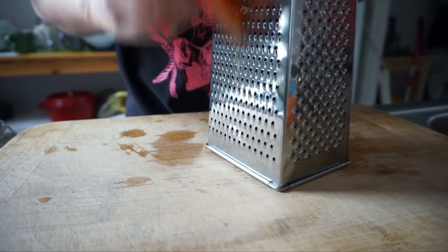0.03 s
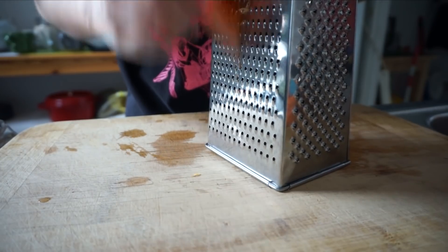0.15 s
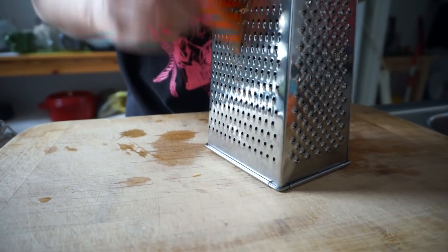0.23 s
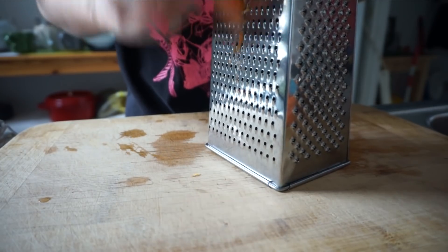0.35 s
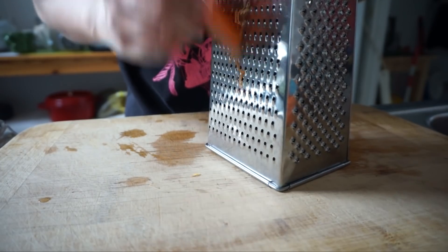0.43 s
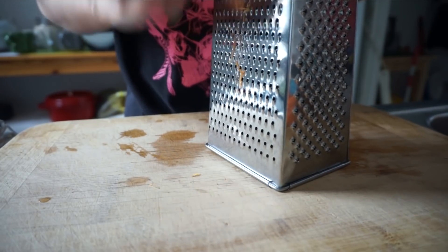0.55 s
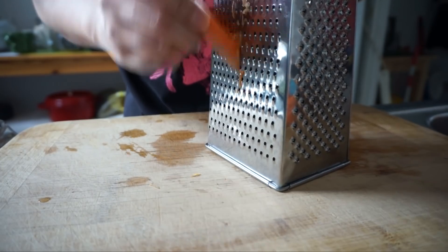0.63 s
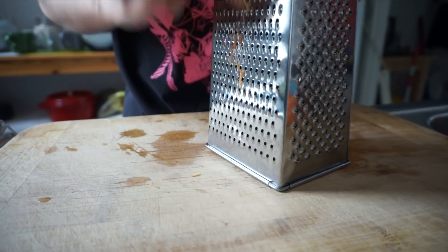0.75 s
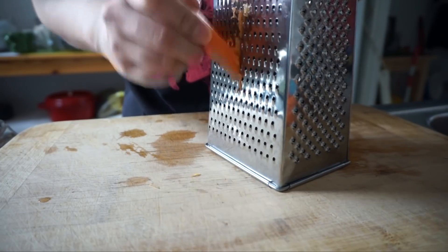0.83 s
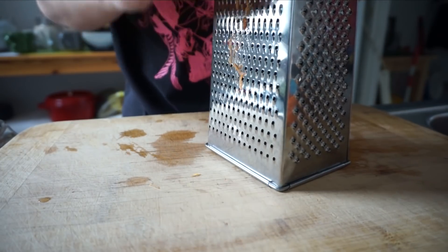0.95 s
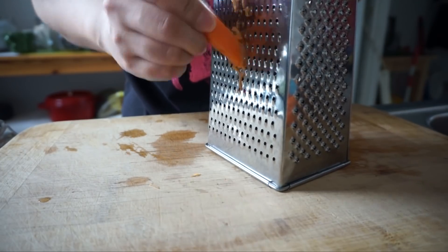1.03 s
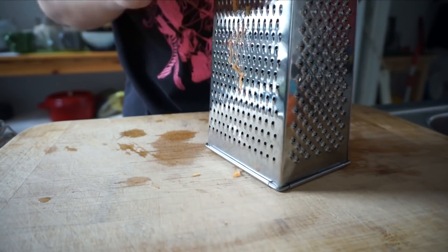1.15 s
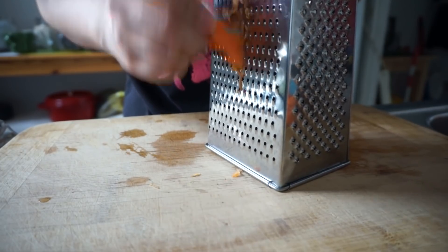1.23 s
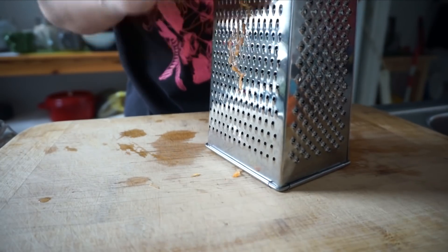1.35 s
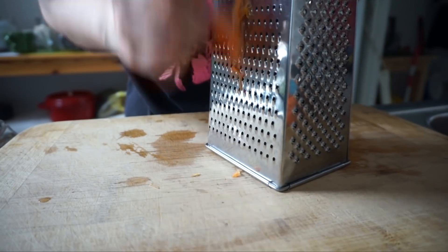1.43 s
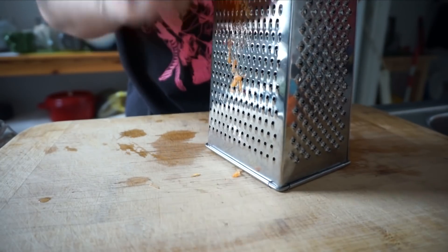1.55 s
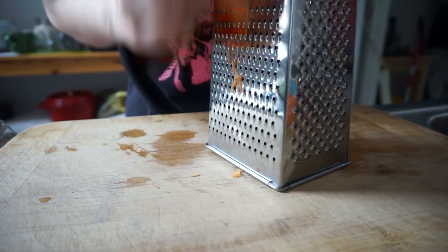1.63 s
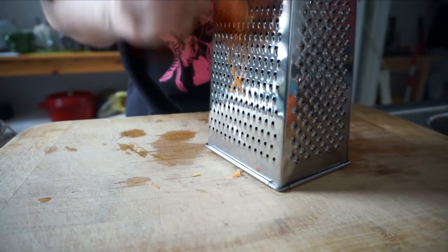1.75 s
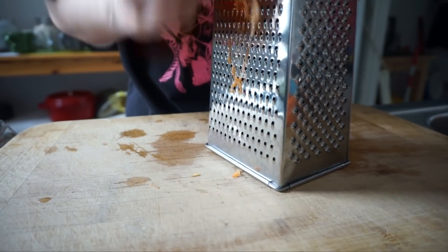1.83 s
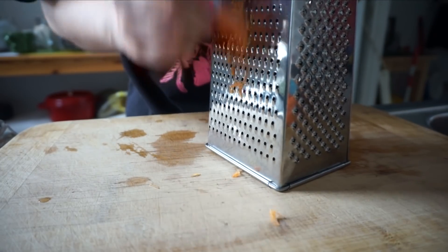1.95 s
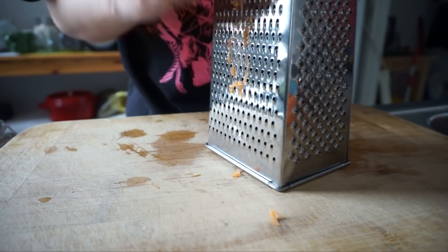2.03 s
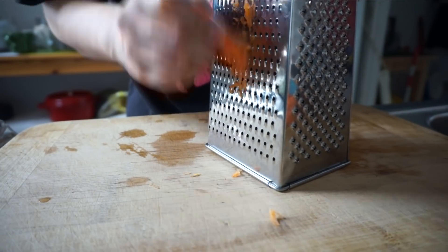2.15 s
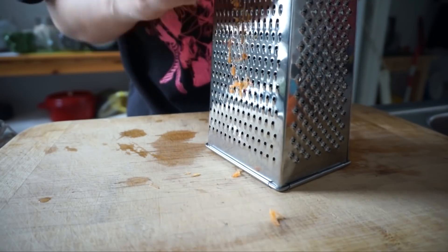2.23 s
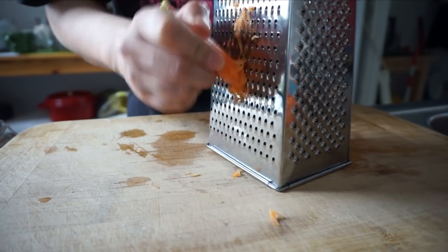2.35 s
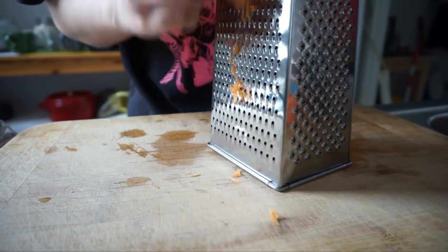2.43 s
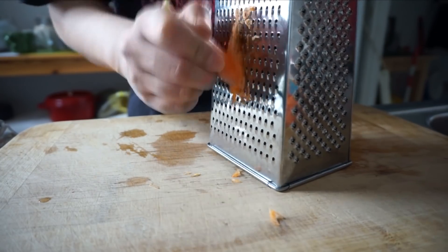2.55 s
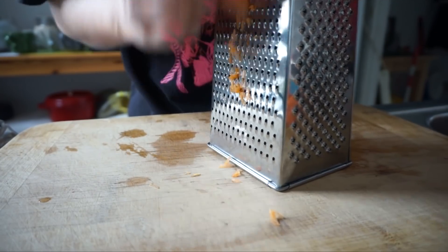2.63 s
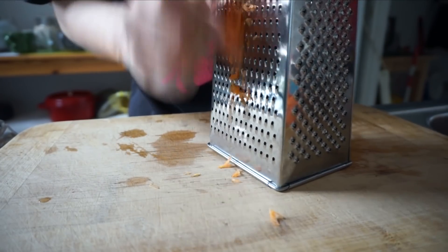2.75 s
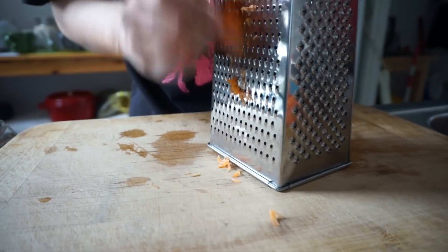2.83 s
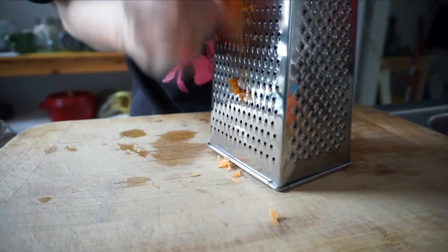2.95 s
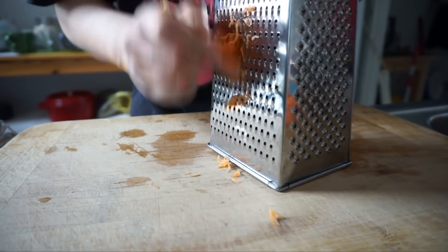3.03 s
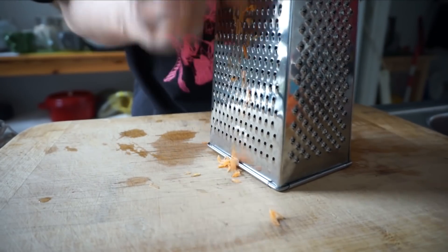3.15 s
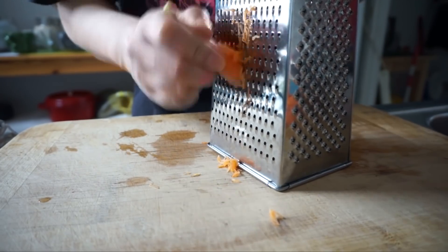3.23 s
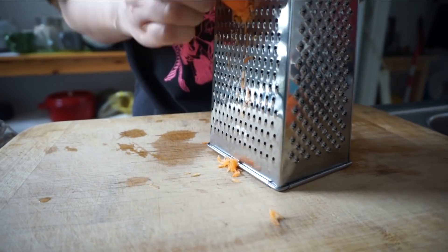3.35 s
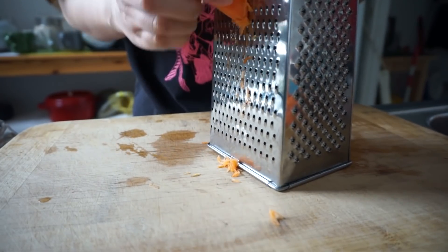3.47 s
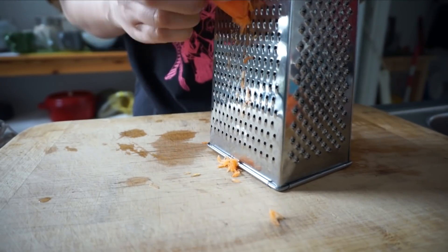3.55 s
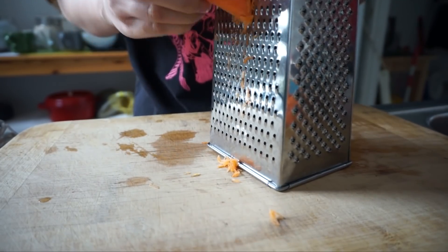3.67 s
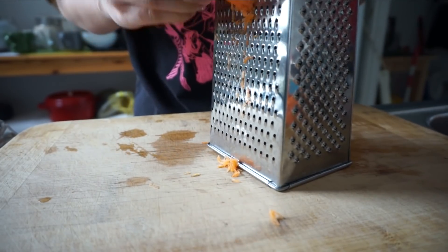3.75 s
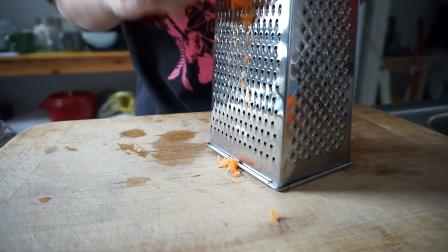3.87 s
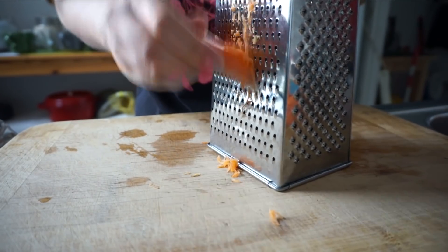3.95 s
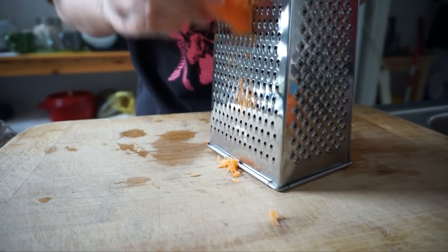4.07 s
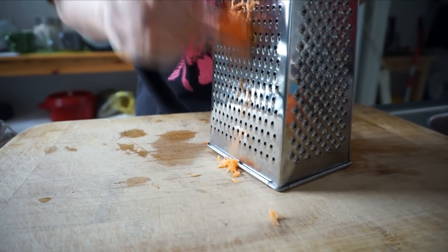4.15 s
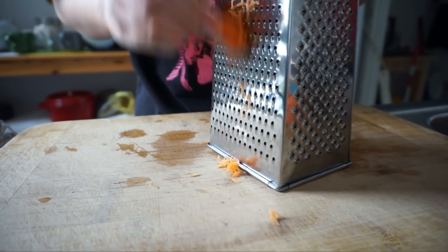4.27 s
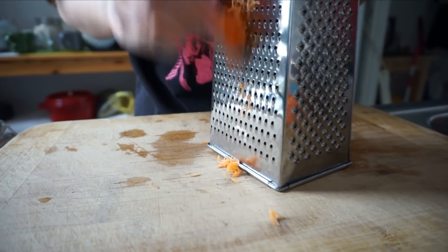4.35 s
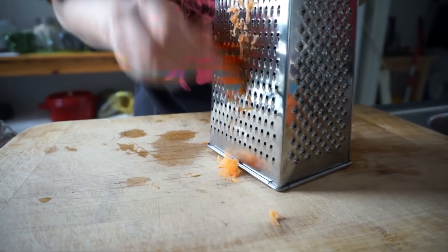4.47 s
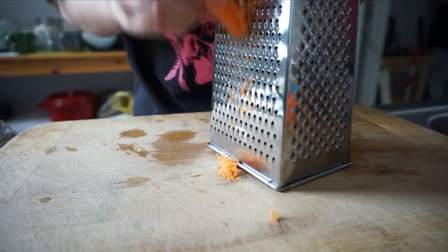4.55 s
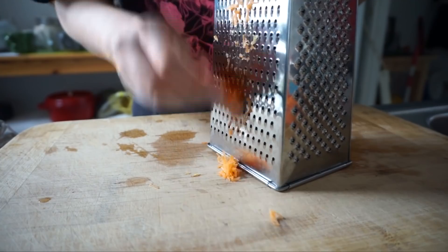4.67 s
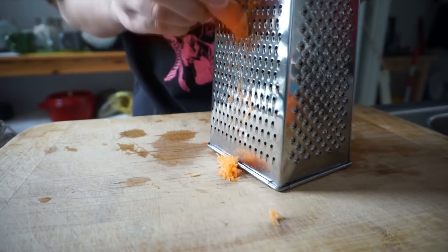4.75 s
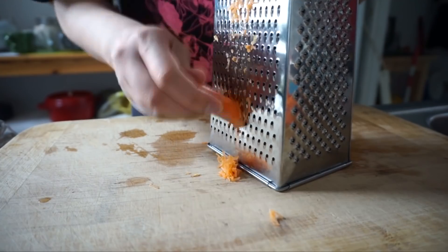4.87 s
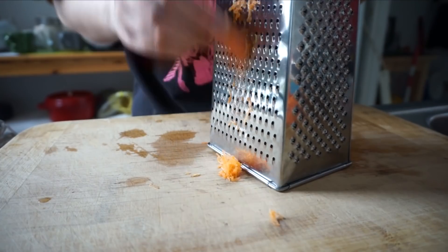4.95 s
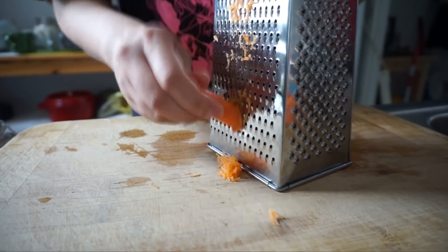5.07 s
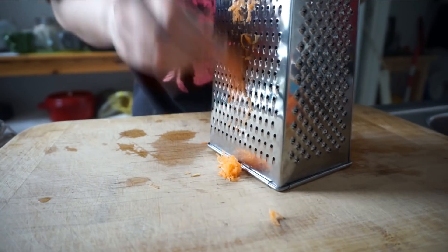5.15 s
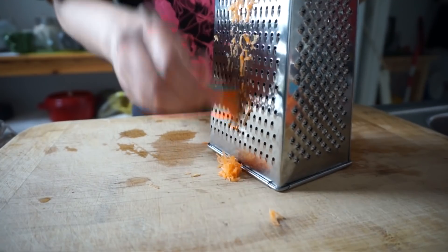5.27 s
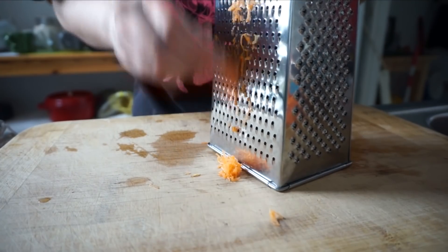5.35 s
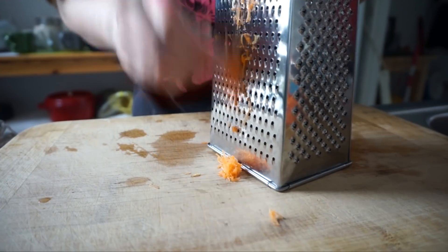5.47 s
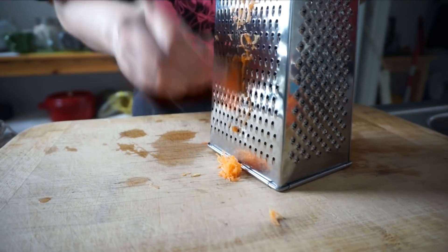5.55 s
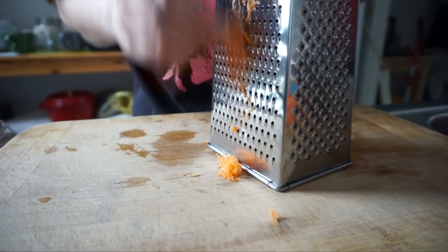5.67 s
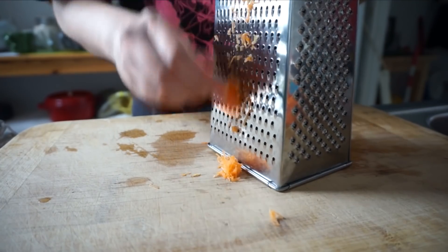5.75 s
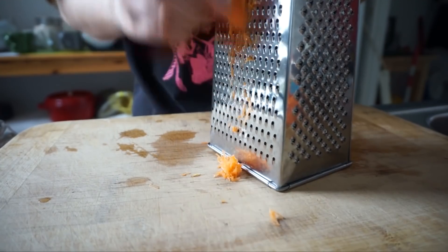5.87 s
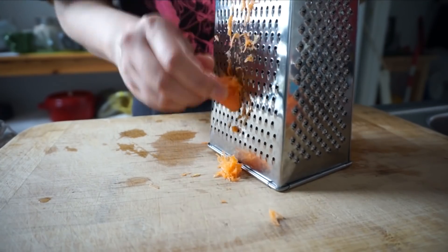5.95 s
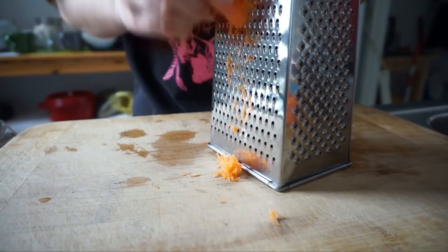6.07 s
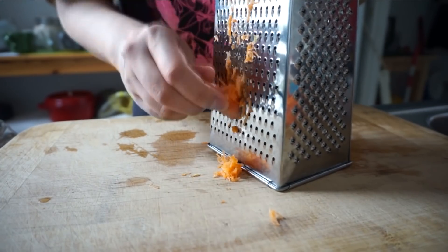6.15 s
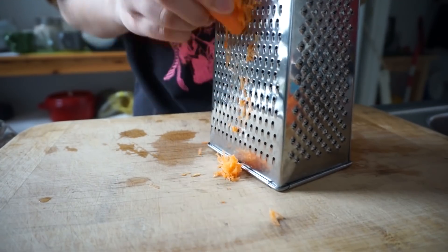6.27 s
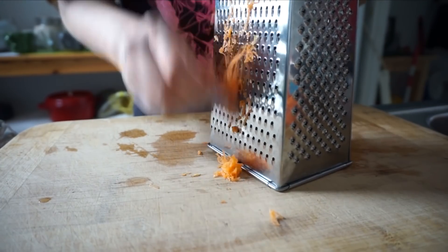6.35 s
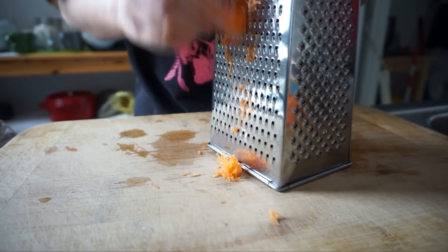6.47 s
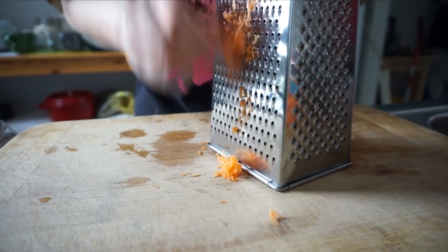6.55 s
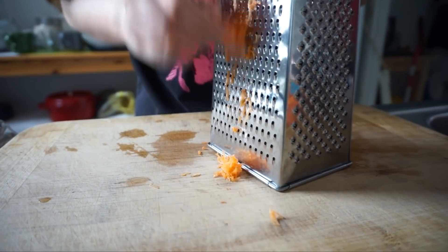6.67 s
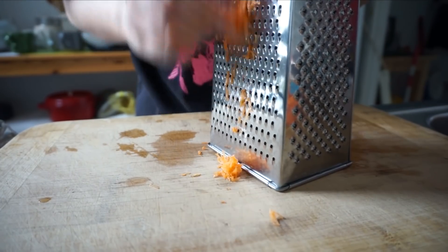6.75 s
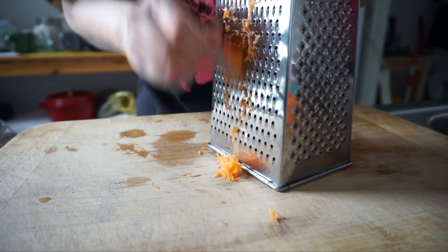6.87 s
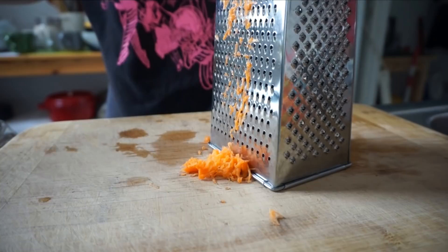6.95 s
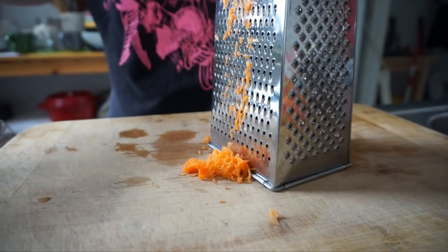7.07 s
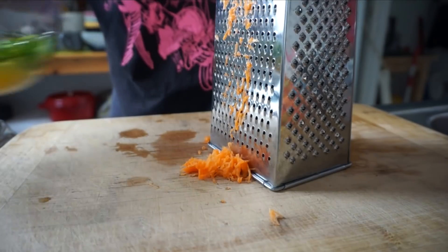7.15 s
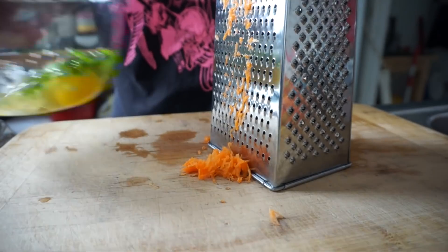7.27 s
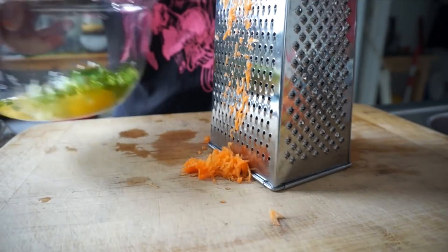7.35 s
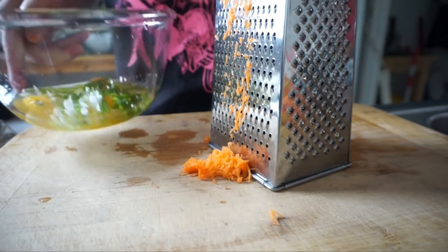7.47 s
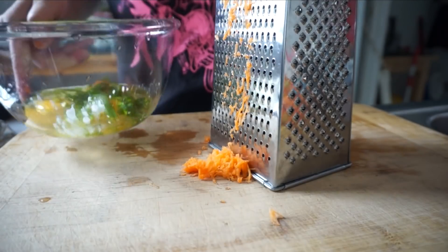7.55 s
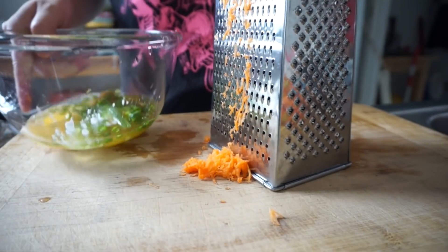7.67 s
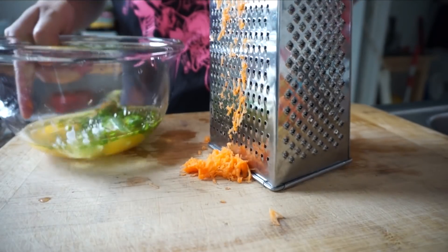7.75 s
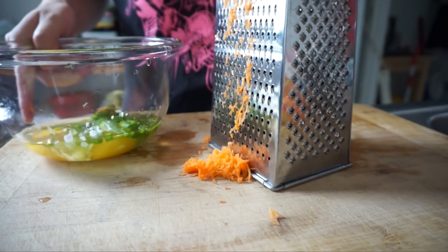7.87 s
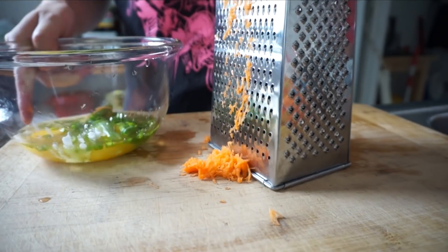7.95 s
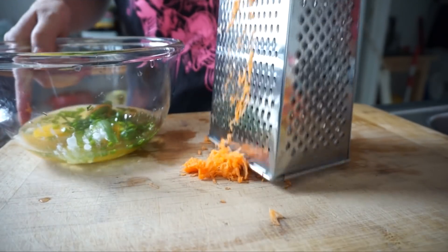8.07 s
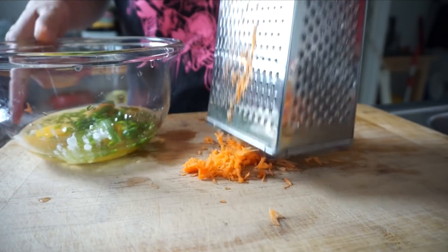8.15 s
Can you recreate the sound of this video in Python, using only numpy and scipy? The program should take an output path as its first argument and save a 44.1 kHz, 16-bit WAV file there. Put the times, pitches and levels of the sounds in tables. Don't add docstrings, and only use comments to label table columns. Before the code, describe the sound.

A small kitchen heard through a camera microphone, almost central. A carrot rasps quickly down and up a thin metal grater, crisp tearing mixed with tinny ringing and a slight boxy boom. The hand lifts, grazes the steel faintly and grates again. The rasping ends suddenly, leaving low room noise, small metallic touches and finally a hard glass clunk with a short, dull rocking clatter on wood.

```python
import sys
import numpy as np
from scipy import signal
from scipy.fft import rfft, irfft, next_fast_len
from scipy.io import wavfile
from scipy.ndimage import uniform_filter1d

SR = 44100
rng = np.random.default_rng(int(sys.argv[2]) if len(sys.argv) > 2 else 0)


def wav_out(sig):
    wavfile.write(sys.argv[1], SR, np.round(np.clip(np.atleast_2d(sig).T, -1, 1) * 32767).astype(np.int16))


def voltage_ratio(decibels):
    exponent = np.asarray(decibels, float) / 20
    return 10 ** exponent


N = 362080
LIFT_S, CUT_S = 3.43, 7.037
SIDES = np.array([[1], [-1]])

# turn_s, bite_db, ease_db (as the pressure eases), box_boom_db
DOWN = [(-.035, -13, -16.5, -1), (0.177, -10, -11, -2), (.382, -16, -13, -1.5), (0.597, -11.5, -13.5, 2.5),
        (0.808, -7.5, -11.5, -1), (1.023, -11.5, -12.5, 0), (1.237, -11.5, -9.5, -1.5),
        (1.449, -9.5, -13, 1), (1.67, -15, -11.5, 0.5), (1.884, -14, -16, -0.5),
        (2.102, -10.5, -12.5, -1.5), (2.321, -14, -15, 2), (2.539, -12.5, -14.5, 3.5),
        (2.763, -12.5, -13.5, 4.5), (2.986, -13, -14.5, -3), (3.206, -16, -13.5, 0),
        (3.928, -16.5, -12.5, -2), (4.189, -11, -15.5, -1.5), (4.402, -11, -14, 2.5),
        (4.617, -10.5, -13, -1), (4.843, -13, -11, 1), (5.065, -14, -13.5, 4), (5.285, -12.5, -14, 0.5),
        (5.5, -13, -12, -0.5), (5.712, -14, -15, 0.5), (5.931, -13, -14, 0), (6.143, -11.5, -12.5, 0),
        (6.361, -15, -14, -1), (6.585, -15, -17, 1), (6.798, -11.5, -13.5, 2)]
# peak_s, level_db, rise_s, fall_s
GRAZES = [
    (3.448, -26.5, 0.016, 0.035),
    (3.479, -24.5, 0.017, 0.028),
    (3.669, -43, 0.049, 0.017),
    (3.776, -43, 0.047, .013),
    (3.89, -30.5, 0.0049, 0.028),
]
# start_s, glass_ring_db, board_thud_db
KNOCKS = [(7.735, -39, -37), (7.84, -3, -13), (7.844, -7, -29), (7.870, -6, -39), (7.877, -1.5, -42),
          (7.889, -14, -42), (7.894, -6, -13), (7.899, -14, -39), (7.906, -21, -33), (7.92, -15, -20),
          (7.934, -11, -35), (7.941, -21, -8.5), (7.95, -8, -32), (7.96, -8, -29), (7.974, -22, -23),
          (7.991, -15, -30), (8.009, -24, -39), (8.022, -25, -43), (8.033, -19, -43), (8.045, -31, -17),
          (8.09, -29, -51), (8.112, -26, -51), (8.125, -33, -47), (8.143, -36, -55), (8.161, -41, -56),
          (8.181, -39, -55)]


def grater():
    teeth_per_s, snap_spread_db = 9000, 2
    rasp_db, steel_db = -1, -2
    boom, wall, face, hiss = contact()
    level_db = pressure()
    haste_db = np.clip(level_db + 16.0, -20, 5)
    bright_db = 0.079 * haste_db
    zones = np.array([boom + 0.11 * haste_db, wall - bright_db, face, 0 * boom, hiss + bright_db])
    sizes = voltage_ratio(snap_spread_db * np.minimum(rng.exponential(1, N), 5)) * rng.choice([-1, 1], N)
    snaps = rms_one(sizes * (rng.random(N) < teeth_per_s / SR))
    direct = teeth_rasp(snaps, level_db, zones)
    walls = steel_walls(snaps, level_db, zones)
    return low_cut(voltage_ratio(rasp_db) * direct + voltage_ratio(steel_db) * walls, 316)


def teeth_rasp(snaps, level_db, zones):
    # pitch_hz, level_db
    rasp_colour = [(24, -52), (40, -55), (243, -70), (296, -0.5), (431, -10), (501, -1), (892, -5),
                   (1150, 0), (1430, -9), (2680, 1), (2970, 0), (5550, -2.5), (15900, -10.5)]
    rasp = colour(snaps * voltage_ratio(level_db), rasp_colour) / np.std(colour(snaps, rasp_colour))
    grid_hz = np.geomspace(30, 20000, 60)
    direct = 0
    for k in range(5):
        share = np.maximum(1 - abs(zone_of(grid_hz) - k), 1e-4)
        direct = direct + voltage_ratio(zones[k]) * colour(rasp, np.c_[grid_hz, 20 * np.log10(share)])
    return direct


def steel_walls(snaps, level_db, zones):
    steel_hz = [300, 511, 700, 757, 975, 1150, 1279, 1696, 1910, 2085, 2197, 2320, 2408, 2620, 2660, 2790,
                3410, 3488, 3922, 4062, 4209, 4511, 4657, 5107, 5537, 5900, 8200]
    # level_db, t60_s
    steel = [(-10.5, 0.06), (-5, 0.054), (-7.5, 0.046), (-3, 0.05), (-5, 0.13), (1, 0.3), (1, 0.071),
             (-3, 0.037), (-1.5, 0.037), (-19, 0.11), (2, 0.044), (-5.5, 0.055), (-2.5, 0.016), (-26, 0.2),
             (3, 0.061), (-2.5, 0.026), (-6.5, 0.14), (1, 0.051), (1, 0.11), (-5, 0.065), (2, 0.026),
             (-0.5, 0.02), (-19, 0.036), (-4.5, 0.051), (1, 0.019), (-14, 0.046), (-30, 0.062)]
    loading = [-1.5, -0.07, 0.98, -0.03, 0.064, -0.7, 0.45, -0.87, 0.79, -0.48, 0.36, 0.87, -0.76, 0.54, 1,
               -0.35, -.1, -0.93, -0.7, -0.86, 0.2, -1.1, -1, -0.019, 0.32, -0.17, .4]
    regripped = [4.3, -0.7, 2.8, -1.9, -10, 2.5, -2, 3, -4.3, -7, -0.5, 4, 1, -2, 0.5, -0.2, 8, -1, 2, -1,
                 -1, 1, 6, 1.5, 0.1, -12, 0.1]
    # pitch_hz, level_db, t60_s
    edges = [(1602, -6, 0.13), (2017, -4.5, 0.085), (2200, -4.5, 0.041), (2705, -7, 0.053),
             (3190, -16, .05), (3800, -8, 0.035), (5110, -9, .04), (5320, -7, 0.032), (6800, -18, .02),
             (7350, -13, .02), (7900, -10, .02), (8900, -7.5, .015), (11050, -10, .015), (11100, -24, .015)]
    wander_db, steady_below_hz, steady_share = 3.8, 1400, 0.3
    damped_cycles = 100
    since = np.arange(N) / SR - 3.5
    modes = []
    for hz, (db, t60), slope, grip_db in zip(steel_hz, steel, loading, regripped):
        modes.append((hz, db + slope * since + grip_db * (since > 0), t60))
    walls = 0
    for number, (hz, mode_db, t60) in enumerate(modes + edges):
        steady = hz < steady_below_hz
        k = min(int(zone_of(hz)), 3)
        contact_db = zones[k] + (zone_of(hz) - k) * (zones[k + 1] - zones[k])
        moving_db = wander_db * (steady_share if steady else 1) * drift(24)
        drive = np.roll(snaps, 997 * number) * voltage_ratio(level_db + mode_db + contact_db + moving_db)
        t60 = t60 if steady else min(t60, damped_cycles / hz)
        walls = walls + ring(drive, hz, t60) / np.sqrt(t60 * SR)
    return walls


def zone_of(hz):
    centre_hz = [500, 1200, 2400, 4500, 11000]
    return np.interp(np.log(hz), np.log(centre_hz), np.arange(5))


def pressure():
    # start_s, extra_db
    snags = [(0.149, 2), (0.339, 3), (0.55, 7.5), (.618, 3), (.715, 2), (.778, 1), (1.189, 6), (1.408, 7),
             (1.644, 11), (1.828, 2), (1.848, 9), (1.902, 5), (2.338, -4), (2.896, 9.5), (3.228, 5),
             (4.128, 11), (4.34, 2), (4.375, 4), (4.533, 0), (5.625, 11), (5.698, -1), (5.731, 1),
             (5.902, 9), (6.603, 3)]
    lift_db, hover_db, last_db = -41, -65, -29
    bite_db, bite_s = 2, 0.008
    flutter_db, rows_db, rows_per_s = 1, 0.5, 51
    rows = [(LIFT_S, lift_db), (LIFT_S + 0.1, hover_db), (GRAZES[-1][0], hover_db), (CUT_S + 0.0092, last_db)]
    jolts = np.zeros(N)
    for (s, first_db, ease_db, _), (bite, ease, turn_db, _, _), (swell_db, *_), _ in strokes():
        middle = ((bite + ease) / 2, (first_db + ease_db) / 2 + swell_db)
        rows += [(s, turn_db), (bite, first_db), middle, (ease, ease_db)]
        jolts[max(round(bite * SR), 0)] = bite_db
    for s, extra_db in snags:
        jolts[round(s * SR)] += extra_db
    jolts = signal.lfilter([1], [1, -np.exp(-1 / (bite_s * SR))], jolts)

    def graze_db(t):
        span_db = 15
        return np.max([db - span_db * np.maximum((s - t) / rise, (t - s) / fall)
                       for s, db, rise, fall in GRAZES], axis=0)

    level_db = np.maximum(in_time(sorted(rows))[0], smooth(graze_db))
    return level_db + jolts + flutter_db * drift(84) + rows_db * drift(rows_per_s)


def contact():
    clog_db_per_s, scatter_db = 0.2, 1.25
    rows = []
    for (s, _, _, boom_db), feel, tint, end in strokes():
        hiss_db = tint[3] + clog_db_per_s * s + scatter_db * rng.standard_normal()
        rows.append(((s + end) / 2, boom_db, tint[1] + feel[3], tint[2] + feel[4], hiss_db))
    rows += [(graze[0], 1, 2, 2.3, -0.85) for graze in GRAZES]
    return in_time(sorted(rows))


def strokes():
    # turn_s, bite_db, ease_db, box_boom_db
    up = [(.073, -16, -16, -9), (0.278, -17.5, -17, -5), (.5, -20.5, -18, -12), (.703, -20, -15.5, -9),
          (0.918, -18, -17.5, -2), (1.134, -17, -18, -7), (1.35, -16.5, -17.5, -8),
          (1.56, -17.5, -17, -5.5), (1.783, -16, -20.5, -6), (1.996, -18, -14, -5), (2.218, -19.5, -14, -3),
          (2.434, -16.5, -16, -4), (2.655, -22.5, -12.5, -7), (2.879, -14.5, -17, -3),
          (3.1, -22.5, -17, 0.5), (3.316, -19.5, -22.5, -3), (4.063, -24, -19.5, 3), (4.29, -24.5, -17, 6),
          (4.512, -15, -17, 1.5), (4.731, -17.5, -18.5, 2.5), (4.957, -17.5, -17.5, 1),
          (5.178, -15, -20, -3), (5.392, -15, -18.5, -1), (5.605, -21, -18.5, -4), (5.82, -15, -26, -7),
          (6.039, -15, -18, -3), (6.253, -14.5, -19.5, -1), (6.472, -19, -16, -6), (6.696, -20, -17.5, -3),
          (6.916, -16, -20, -9.5)]
    # bite_s, ease_s, turn_db, wall_ring_db, face_ring_db
    down_feel = [(0.0, 0.05, -28.0, -1.5, -1.5), (0.201, 0.249, -28.5, -3, -3.5),
                 (0.398, 0.459, -30, -2, 0.5), (0.622, 0.675, -31.5, -1, -0.5),
                 (0.838, 0.888, -31, -3.5, -3), (1.046, 1.1, -30.0, -4, -1), (1.261, 1.31, -29, -4, -5),
                 (1.475, 1.537, -28, -4, -4.5), (1.686, 1.739, -31, -3, -1),
                 (1.905, 1.973, -32, -2.5, -1.0), (2.118, 2.189, -38, -6, -2.5),
                 (2.339, 2.41, -32.5, -2.5, -1.5), (2.56, 2.627, -36, -5, 0), (2.792, 2.855, -28, -4, -1),
                 (3.01, 3.079, -28, -1.5, 0.5), (3.227, 3.29, -30.5, -1.5, 2.5),
                 (3.957, 4.029, -47, -4, -0.5), (4.214, 4.269, -38.5, -0.5, -4),
                 (4.429, 4.487, -33.5, 1, -1.5), (4.646, 4.705, -29.5, -3.5, -3),
                 (4.864, 4.922, -32, -2.5, -1.5), (5.087, 5.148, -36, -2, 0.5),
                 (5.308, 5.363, -34.5, -4, -3), (5.523, 5.583, -33.5, -3, 1), (5.74, 5.795, -33.5, -5.5, 1),
                 (5.954, 6.011, -34, -2.5, -1.5), (6.168, 6.231, -31, -1.5, -1),
                 (6.384, 6.449, -32.5, -3.5, 2), (6.609, 6.671, -36, -2.5, 1.5),
                 (6.826, 6.887, -36, -5, -1.5)]
    up_feel = [(0.091, 0.156, -26.5, -3, 0.5), (0.298, 0.36, -27.5, -0.5, -1),
               (0.52, 0.585, -30.5, 2.0, -4), (0.716, 0.779, -31, -3, 0.5), (0.941, 0.995, -24.5, -4, 0.5),
               (1.156, 1.224, -32, -1.5, 1), (1.376, 1.44, -27, 3, -0.5), (1.573, 1.648, -26.5, 1.5, 2.5),
               (1.823, 1.869, -30, -1.5, -0.5), (2.02, 2.095, -29, -1.5, -1), (2.23, 2.291, -30, -1.5, 1),
               (2.452, 2.523, -28, -2.5, 0), (2.671, 2.727, -30, -2.5, -1), (2.903, 2.969, -26, 0, 0),
               (3.106, 3.182, -29, -1.5, -0.5), (3.333, 3.403, -30, -1, 1.5), (4.089, 4.152, -35, 3, 3),
               (4.299, 4.373, -30, -3, 3), (4.538, 4.585, -30, 2.5, 3.5), (4.754, 4.828, -29.5, 1.5, -0.5),
               (4.977, 5.034, -32, 1, 2), (5.199, 5.262, -31, -0.5, 2), (5.415, 5.477, -30.5, 1.5, 3),
               (5.619, 5.703, -33, 4, 2), (5.842, 5.92, -32, 4.5, -0.5), (6.063, 6.121, -28.5, 3, -2.5),
               (6.277, 6.341, -30.5, 3.5, 1.5), (6.493, 6.557, -31, 2, -2), (6.721, 6.774, -31, 0.5, 0.5),
               (6.948, 7.001, -29, 1, -2)]
    down_colour, up_colour = (1.5, 4.5, 0, 2.5), (1.45, 3, 0.5, -1)
    rows = [(row, feel, down_colour) for row, feel in zip(DOWN, down_feel)]
    rows += [(row, feel, up_colour) for row, feel in zip(up, up_feel)]
    rows.sort()
    turns = [row[0] for row, _, _ in rows] + [CUT_S + 0.012]
    return [(*row, min(end, LIFT_S) if row[0][0] < LIFT_S else end) for row, end in zip(rows, turns[1:])]


def fingers():
    # start_s, peak_db
    taps = [
        (7.0828, -55),
        (7.127, -26.5),
        (7.148, -45),
        (7.212, -31),
        (7.2719, -46),
        (7.3098, -45),
        (7.3344, -43),
        (7.415, -28.5),
        (7.782, -31),
    ]
    # start_s, length_s, level_db
    rests = [
        (5.4, 0.45, -60),
        (7.06, 0.1, -44),
        (7.2, .13, -43),
        (7.42, .13, -41),
        (7.74, 0.57, -39.5),
        (7.34, 0.46, -64),
    ]
    # start_s, length_s, level_db
    glides = [
        (7.45, 0.24, -44.5),
        (7.55, 0.12, -54),
        (7.05, 1.2, -78),
    ]
    # start_s, length_s, level_db
    regrip = [
        (3.5, 0.066, -39),
        (3.6, 0.18, -44),
    ]
    tap_s = 0.015
    rub = rng.standard_normal((2, N))
    push = voltage_ratio(-31.5) * hand(rests) * rub[0]
    since = np.arange(SR // 10) / SR
    for s, peak_db in taps:
        span = slice(round(s * SR), round(s * SR) + len(since))
        push[span] += voltage_ratio(peak_db - 30.5) * np.exp(-since / tap_s) * rub[1, span]
    glide, shift = voltage_ratio(-24.0) * hand(glides) * rub[1], voltage_ratio(-30.0) * hand(regrip) * rub[1]
    low_modes = [(1156, -12, 0.072), (1210, -2.5, 0.085), (1290, -11, 0.04), (2350, -11.0, 0.03)]
    high_modes = [(1910, -10, 0.03), (1930, -7, 0.04), (3300, -6, 0.036), (3860, -18, 0.03)]
    low = sum(voltage_ratio(db) * ring(push, hz, t60) for hz, db, t60 in low_modes)
    high = sum(voltage_ratio(db) * ring(glide, hz, t60) for hz, db, t60 in high_modes)
    grip = sum(ring(shift, hz, t60) for hz, t60 in [(2015, 0.073), (1830, 0.043), (640, 0.019)])
    return low_cut(low + high + grip, 670)


def hand(rows):
    rise_s, sag_db_per_s = 0.027, 5

    def gain(t):
        total = 0
        for s, length, db in rows:
            fade = np.clip(np.minimum(t - s, s + length - t) / rise_s + 1, 0, 1) ** 2
            total = total + voltage_ratio(db - sag_db_per_s * np.clip(t - s, 0, length)) * fade
        return total

    return smooth(gain)


def bowl():
    # pitch_hz, level_db, t60_s
    glass = [(958, 3, 0.031), (977, -14, 0.27), (1030, -7, 0.05), (1110, -19, 0.05), (1240, -11, .06),
             (1285, -25, 0.06), (1660, -7.5, 0.051), (1750, -19, .06), (2070, -12, .05), (2420, -20, .04),
             (2650, -17, 0.033)]
    # pitch_hz, level_db, t60_s
    board = [(330, -12, 0.035), (510, -1.5, 0.022), (720, -8, 0.031)]
    soft_dull_db = 6.5
    start = int(7.7 * SR)
    touch_s, ring_db, thud_db = np.transpose(KNOCKS)
    at = (touch_s * SR).round().astype(int) - start
    soft = touch_s >= 7.85
    parts = []
    for hz, db, t60 in glass:
        luck_db = rng.normal(0, 2.6, len(KNOCKS))
        dull_db = soft * soft_dull_db * abs(np.log2(hz / glass[0][0]))
        parts.append((hz, db - 3.0 + ring_db + luck_db - dull_db, t60))
    parts += [(hz, db + 2.5 + thud_db, t60) for hz, db, t60 in board]
    rounding = signal.butter(8, 2800, fs=SR, output="sos")
    out = np.zeros(N - start)
    for hz, db, t60 in parts:
        push = np.zeros((2, N - start))
        push[soft.astype(int), at] = voltage_ratio(db)
        sharp = signal.sosfilt(rounding, push[0] + 1e-18)
        rocking = np.convolve(push[1], settle(hz))[round(2 * SR / hz):][:N - start]
        out += ring(sharp + rocking, hz, t60)
    return low_cut(np.r_[np.zeros(start), out], 300) + clatter() + rim_ticks()


def settle(hz):
    t = np.arange(round(7.0 * SR / hz)) / SR
    swell = np.hanning(len(t))
    return 2 * swell * np.cos(2 * np.pi * hz * t) / swell.sum()


def clatter():
    # pitch_hz, level_db
    blow_colour = [(200, -30), (400, 1), (1000, 5), (1700, 2.5), (2200, 0), (2700, -8), (3700, -20.5),
                   (4200, -36), (8000, -62)]
    crack_db, crack_s = -6.5, 0.0047
    rattle_db, rattle_t60_s = -23, 0.62
    since = np.maximum(np.arange(N) / SR - KNOCKS[1][0] + 0.00094, 0)
    crack = voltage_ratio(crack_db) * np.exp(-since / crack_s)
    rattle = voltage_ratio(rattle_db - 60 * since / rattle_t60_s + 2.0 * drift(40))
    noise = rms_one(colour(rng.standard_normal(N), blow_colour))
    blow = noise * (crack + rattle) * np.clip(since / 0.0013, 0, 1)
    return signal.sosfilt(signal.butter(8, 4000, fs=SR, output="sos"), blow)


def rim_ticks():
    # start_s, level_db
    clicks = [
        (7.843, -53),
        (7.952, -37),
        (8.052, -44),
    ]
    t = np.arange(N) / SR
    ticks = sum(voltage_ratio(db) * np.exp(-np.maximum(t - s, 0) / 0.003) * (t > s) for s, db in clicks)
    return low_cut(ticks * rng.standard_normal(N), 3000)


def room_tone():
    # pitch_hz, level_db
    hum = [(18, -72), (30, -45), (183, 4), (327, -6), (430, -8), (552, -9), (663, -1.5), (776, -16),
           (1150, 7.5), (1460, -8), (2100, -3.5), (2340, -2), (2740, -9), (15900, -16.5)]
    # start_s, level_db
    tone_level = [(0.0, -57), (8.21, -47.5)]
    mid, side = rng.standard_normal((2, N))
    tone = rms_one(colour(mid + voltage_ratio(-11.5) * side * SIDES, hum))
    gain = voltage_ratio(in_time(tone_level)[0] + 0.8 * drift(4.3))
    return gain * tone + murmur() + motor_whine() + worktop_boom()


def murmur():
    # pitch_hz, level_db
    murmur_colour = [(18, -50), (30, -41), (92, -11), (128, -13), (192, 3.5), (250, -2.5), (310, 0.5),
                     (350, 4.5), (400, -14), (580, -37), (990, -120)]
    low, side = rng.standard_normal((2, N))
    noise = rms_one(colour(low + voltage_ratio(-27) * side * SIDES, murmur_colour))
    return noise * rumble() * voltage_ratio(1.5 * drift(25))


def rumble():
    # peak_s, level_db
    rocks = [
        (0.0, -39),
        (1.1, -41),
        (2.29, -52),
        (3.5, -50),
        (3.7, -60),
        (4.34, -47),
        (6.22, -65),
        (7.92, -40.5),
        (8.05, -61),
    ]
    rise_s, fall_db_per_s = 0.22, 66

    def gain(t):
        total = voltage_ratio(np.where(t < CUT_S, -49, -60))
        for s, db in rocks:
            rise = np.clip((t - s) / rise_s + 1, 0, 1) ** 2
            total = total + voltage_ratio(db - fall_db_per_s * np.maximum(t - s, 0)) * rise
        return total

    return smooth(gain)


def motor_whine():
    # start_s, level_db
    whine = [(7.5, -85), (7.53, -62), (7.7, -61), (7.84, -72), (7.85, -95)]
    tone = rms_one(ring(rng.standard_normal(N), 14300, 0.008))
    return tone * voltage_ratio(in_time(whine)[0] + 2.5 * drift(60))


def worktop_boom():
    work_db, idle_db = -58, -80
    resume_s = DOWN[16][0]
    at_s = [LIFT_S, LIFT_S + 0.092, resume_s - 0.1, resume_s, CUT_S, CUT_S + 0.02]
    level_db = np.interp(np.arange(N) / SR, at_s, [work_db, idle_db, idle_db, work_db, work_db, idle_db])
    return rms_one(ring(rng.standard_normal(N), 119.6, 0.38)) * voltage_ratio(level_db + 3.7 * drift(3.7))


def kitchen(x):
    t60_s, wall_cut_hz = 0.34, 3600
    t = np.arange(SR // 2) / SR
    noise = rng.standard_normal((2, len(t)))
    dull = signal.sosfilt(signal.butter(2, wall_cut_hz, fs=SR, output="sos"), noise)
    tail = dull * voltage_ratio(-60 * t / t60_s) + (noise - dull) * voltage_ratio(-60 * t / (0.39 * t60_s))
    tail = tail * np.clip(t / 0.008 - 0.2, 0, 1)
    return signal.fftconvolve(x[None], tail / np.sqrt(np.sum(tail ** 2) / 2))[:, :N]


def spread(near, wet):
    # pitch_hz, side_minus_mid_db
    side_colour = [(60, -29), (150, -19), (380, -11), (950, -11), (2380, -16.5), (5980, -58), (15000, -53)]
    # pitch_hz, level_db
    lean = [(100, -20), (500, -21.5), (1100, -19), (2200, -22), (6000, -21.5)]
    mid = (wet[0] + wet[1]) / 2
    side = voltage_ratio(1.5) * colour((wet[0] - wet[1]) / 2, side_colour) - colour(near, lean)
    return near + mid + side * SIDES


def apart(x):
    # low_hz, high_hz, side_under_mid_db
    bands = [(3500, 6000, -18), (6000, 9500, -13), (9500, 14500, -8)]
    rarity = 1.9
    other = np.roll(x.mean(0), 300)
    side = 0
    for low_hz, high_hz, db in bands:
        band = signal.butter(4, [low_hz, high_hz], "band", fs=SR, output="sos")
        side = side + voltage_ratio(db) * (drift(8) > rarity) * signal.sosfilt(band, other)
    return x + side * SIDES


def rms_one(x):
    return x / np.sqrt(np.mean(x ** 2) + 1e-20)


def in_time(rows):
    s, *columns = np.transpose(rows)
    return np.array([np.interp(np.arange(N) / SR, s, c) for c in columns])


def smooth(shape):
    t = np.arange(0, N / SR + 0.002, 0.001)
    return np.interp(np.arange(N) / SR, t, shape(t))


def colour(x, points):
    size = next_fast_len(N)
    hz = np.maximum(np.arange(size // 2 + 1) * SR / size, 1)
    point_hz, point_db = np.array(points).T
    hz_db = np.interp(np.log(hz), np.log(point_hz), point_db)
    return irfft(rfft(x, size) * voltage_ratio(hz_db), size)[..., :N]


def drift(rate):
    r = np.exp(-80 * np.pi * rate / SR)
    slow = signal.lfilter([1], [1, -2 * r, r * r], rng.standard_normal(N // 40 + 2002))[2000:]
    return np.interp(np.arange(N) / 40, np.arange(len(slow)), rms_one(slow))


def ring(clicks, hz, t60):
    r, w = voltage_ratio(-60 / (t60 * SR)), 2 * np.pi * hz / SR
    return signal.lfilter([0, np.sin(w)], [1, -2 * r * np.cos(w), r * r], clicks + 1e-18)


def low_cut(x, hz):
    return signal.sosfilt(signal.butter(4, hz, "high", fs=SR, output="sos"), x)


def scene():
    rasp, late = grater(), bowl()
    before_cut = np.clip((CUT_S * SR - np.arange(N)) / 40, 0, 1)
    grating = spread(rasp, voltage_ratio(-12.0) * kitchen(rasp)) * before_cut
    knocking = spread(late, voltage_ratio(-9) * kitchen(late))
    touches = fingers() * voltage_ratio([[-0.6], [0.6]])
    duck_db, duck_s, blow_s = -1.5, 0.1, KNOCKS[1][0]
    duck = smooth(lambda t: voltage_ratio(duck_db * (t > blow_s) * np.clip(1.5 - (t - blow_s) / duck_s, 0, 1)))
    return grating + knocking + touches + room_tone() * duck


def low_pass(x):
    return signal.sosfilt(signal.butter(12, 16020, fs=SR, output="sos"), x)


def record(dry):
    level_db = 20 * np.log10(uniform_filter1d(np.abs(dry).max(0), 90) + 1e-6)
    fall = 70 * np.arange(N) / SR
    held_db = np.maximum.accumulate(level_db + fall) - fall
    gain_db = uniform_filter1d(-0.55 * np.maximum(held_db + 10.5, 0), 60)
    rounded = np.tanh(apart(dry) * voltage_ratio(gain_db))
    bass = signal.butter(3, 88, "high", fs=SR, output="sos")
    top = signal.ellip(12, 0.3, 60, 15780, fs=SR, output="sos")
    return low_pass(signal.sosfilt(top, signal.sosfilt(bass, rounded)))


dry = scene()
out = record(dry)
wav_out(out)
```